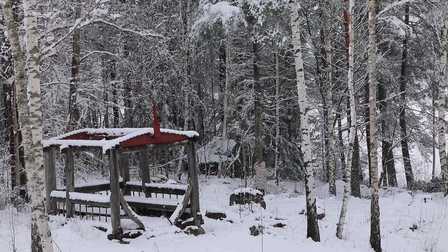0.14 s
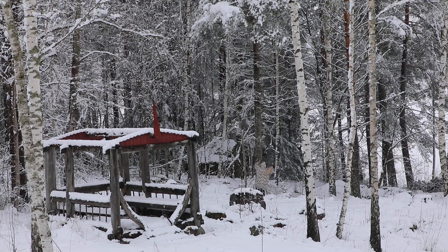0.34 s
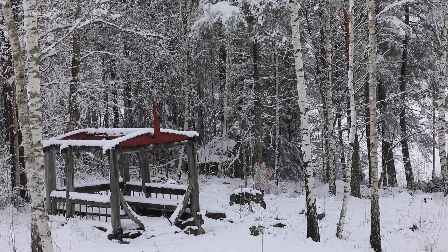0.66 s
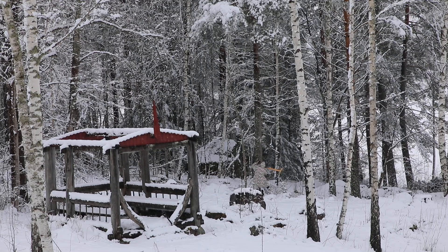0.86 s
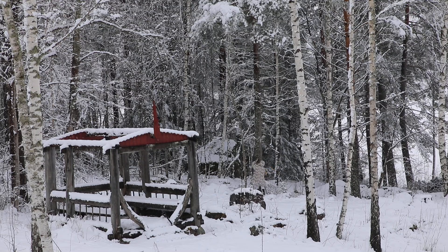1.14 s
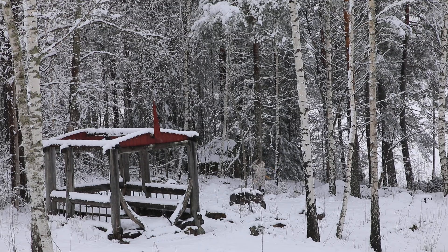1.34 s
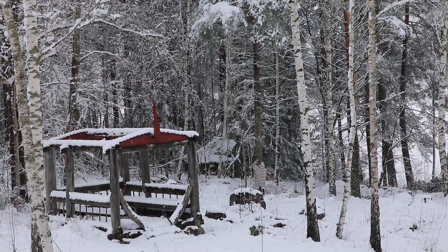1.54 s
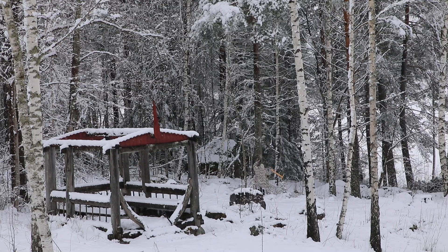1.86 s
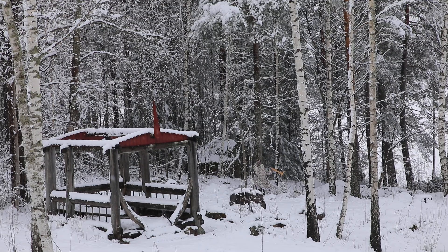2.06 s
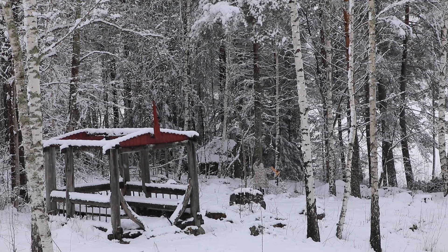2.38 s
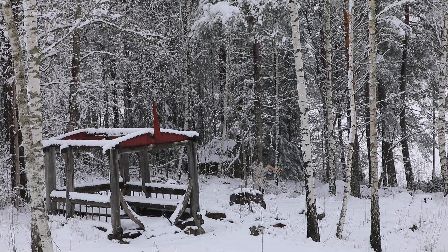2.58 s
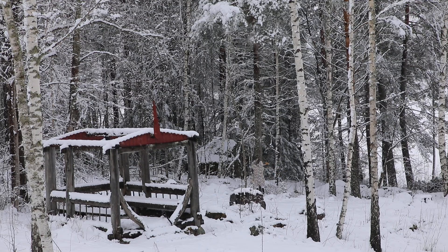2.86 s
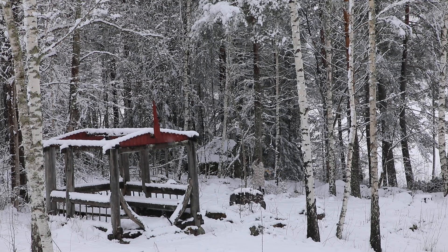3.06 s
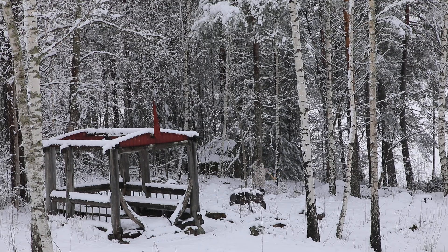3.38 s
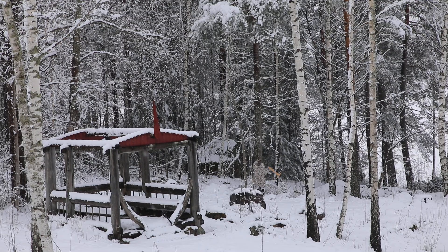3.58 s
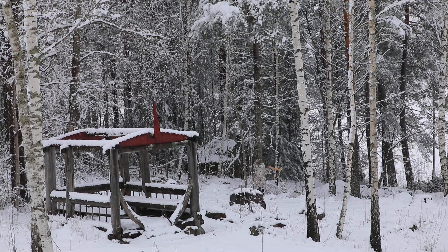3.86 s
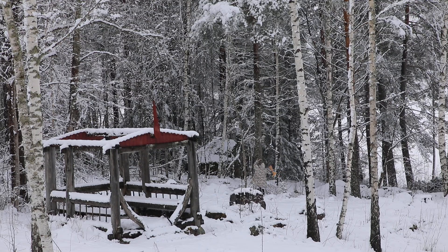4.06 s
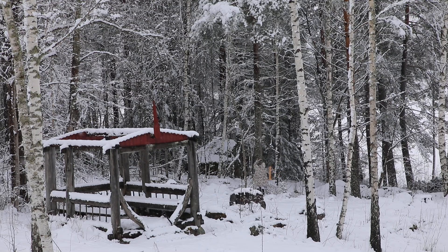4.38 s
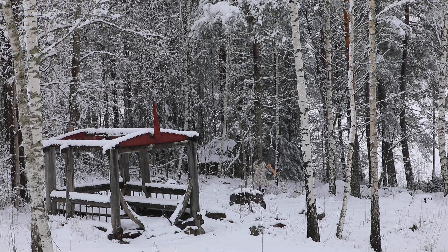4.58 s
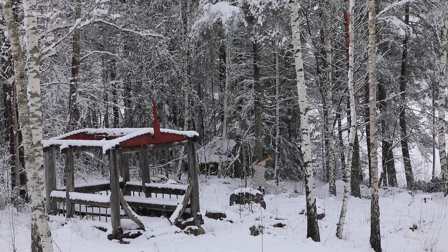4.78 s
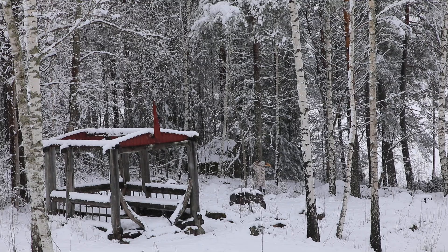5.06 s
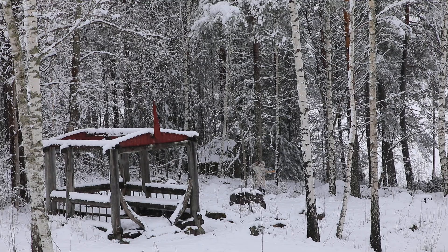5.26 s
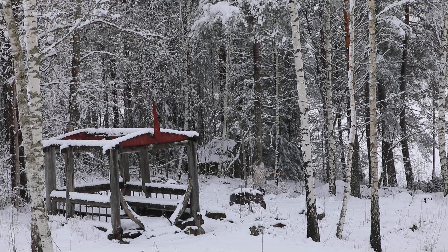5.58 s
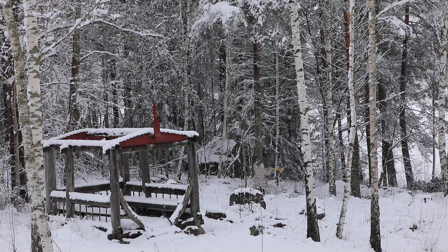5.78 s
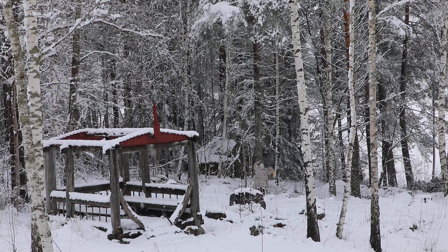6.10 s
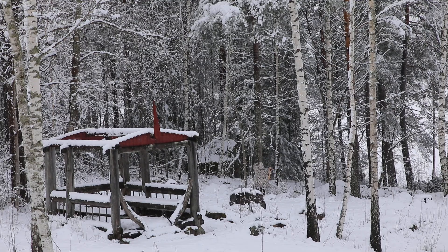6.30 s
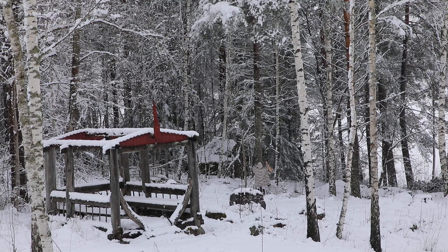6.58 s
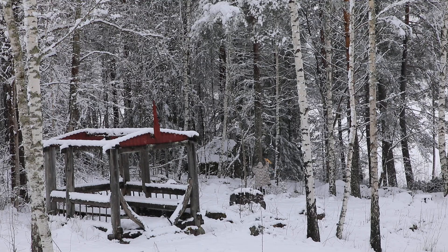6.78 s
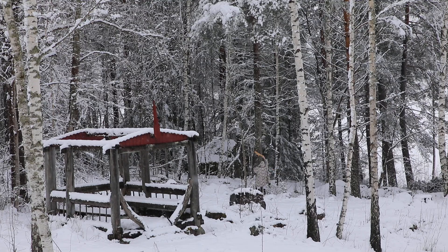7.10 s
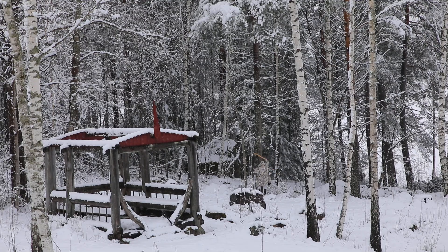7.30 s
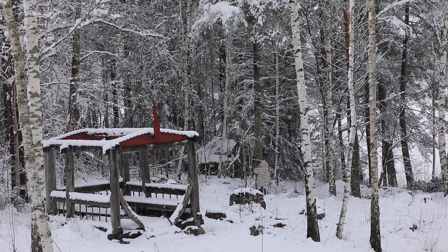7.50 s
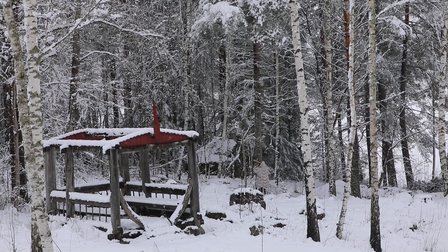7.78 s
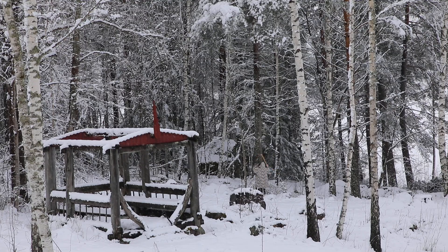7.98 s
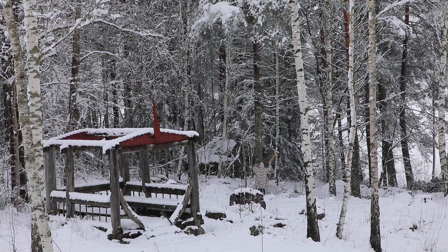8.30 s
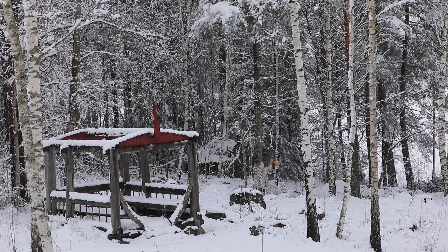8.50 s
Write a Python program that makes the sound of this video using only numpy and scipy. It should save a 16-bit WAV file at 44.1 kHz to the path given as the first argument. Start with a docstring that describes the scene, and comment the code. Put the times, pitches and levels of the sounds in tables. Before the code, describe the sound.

Four sharp axe chops split wood in a snowy forest, each echoing off the trunks, while small birds chatter between them over quiet air.

```python
"""Firewood is split with an axe in a snowy forest: small birds chatter and call over still air from the start.
Four axe blows follow as shaped noise forces, each filtered by its log's resonances; the near trunks scatter
them back as decaying noise and the far forest answers late. Meanwhile birds sing swept sines or throbbing
noise, icy twigs tick as bright bursts, and noise puffs of wind and a wavering low sine lie underneath.
Near the end come a soft knock of wood and a few last twig snaps."""
import sys
import numpy as np
from scipy import signal
from scipy.fft import rfft, irfft, next_fast_len
from scipy.io import wavfile
from scipy.ndimage import uniform_filter1d, map_coordinates

SR = 44100
rng = np.random.default_rng(int(sys.argv[2]) if len(sys.argv) > 2 else 0)


def to_wav(sig):
    """Store sig (one row per channel, or 1-D mono) as 16-bit WAV at the path in sys.argv[1].

    Samples outside -1..1 are clipped; the rate is SR.
    """
    pcm = np.clip(np.atleast_2d(sig), -1, 1) * 32767
    pcm = np.round(pcm).astype(np.int16)
    wavfile.write(sys.argv[1], SR, pcm.T)  # frames by channels


N = 381465

# axe blows: (time [s], level [dB], splitting time [s], splitting level [dB], trunk echo [dB],
#  treble change on the direct path [dB], beamed note [Hz], its height [dB], band that carries furthest [Hz],
#  far echo [dB], ripple of the log's tone [dB], its bass [dB], its midrange [dB], its bite [dB])
AXE_BLOWS = [(1.2184, -7, 0.0017, 27, 1, -14, 838, 9.5, 1590, 4, -3.5, -3.5, 3, 4.5),
             (3.0157, -2.5, 0.02, -13.5, -0.5, -5.5, 858, 8, 1090, 2, 3.5, -2, 2.5, -3),
             (5.051, 5, .017, -9.5, -1.5, -4, 1905, 7, 787, 1, 2.8, -7, -0.5, -5.5),
             (7.5332, -1.5, 0.011, -13.5, -0.5, -2.5, 1035, 12.5, 960, 1, 3, 4, -7, -4.5)]
# modes of wood on the block: (frequency [Hz], width [Hz], height above the broad spectrum [dB])
LOG_MODES = [(250, 69, 3), (494.7, 39, 8), (608, 15, 1.5), (738, 37, 3), (841, 30, 7.5), (950, 100, 4.5),
             (1280, 30, 1), (1385, 10, 12.5), (1513, 52, 6), (1742, 25, 6.5), (1734, 50, -2.5),
             (1906, 26, 12.5), (2112, 34.5, 6), (2342, 20, -0.5), (2590, 45, 3), (2776, 37, 11.5),
             (2884, 75, 14.5), (3700, 150, 9)]
# broad spectrum of struck wood: (frequency [Hz], level [dB])
WOOD_SPECTRUM = [(30, -23), (60, -13.5), (88, 2.5), (140, -19.5), (250, 5.5), (400, 12), (650, 18.5),
                 (950, 20.5), (1300, 16), (2200, 17.5), (3200, 5.5), (4800, -4), (8000, -3.5), (11000, -13),
                 (15500, -33.5)]
SHELTER_DELAY_S = .00811  # extra travel time by way of the shelter


def chops(shelter_db=-12, shade_hz=4000, note_width_hz=45, near_db=-35.5, far_db=-67, blur=0.29,
          carry_width_hz=280, carry_db=7):
    """Source, filter and path: a blow excites log modes, heard directly, off a shelter, trunks and far forest."""
    out = np.zeros(N)
    for s, db, split_s, split_db, echo_db, shade_db, note_hz, note_db, carry_hz, late_db, *tone_db in AXE_BLOWS:
        force = amp(db) * blow(split_s, split_db)

        def broad(hz):
            return along(WOOD_SPECTRUM, hz) + log_tone(hz, *tone_db)

        def modes(hz):
            return sum(resonance(hz, *mode) for mode in LOG_MODES)

        # directivity: one note is beamed to the listener, and the blade's treble may be hidden
        def facing(hz):
            return resonance(hz, note_hz, note_width_hz, note_db) + shelf(hz, shade_hz, shade_db)

        crack = ring(force, lambda hz: broad(hz) + modes(hz) + facing(hz))
        add(out, s, crack)
        add(out, s + SHELTER_DELAY_S, amp(shelter_db) * crack)
        # echoes gather sound sent out in all directions, so single modes stand out less
        spread = ring(force, lambda hz: broad(hz) + (1 - blur) * modes(hz))
        add(out, s, amp(near_db + echo_db) * trunks(spread))
        carried = ring(force, lambda hz: broad(hz) + resonance(hz, carry_hz, carry_width_hz, carry_db))
        add(out, s, amp(far_db + late_db) * distance(carried))
    return out


def blow(split_s, split_db, bite_s=.002, easing_s=.04, release_s=0.0011, tear_hz=4500, dull_db=-7):
    """Impact and fracture: a sharp bite, then duller tearing fibres, easing until the log gives way."""
    t = np.arange(2048) / SR
    edge = np.exp(-t / bite_s)
    tearing = amp(split_db) * np.exp(-t / easing_s - np.maximum(t - split_s, 0) / release_s)
    force = burst(np.hypot(edge, tearing))
    dull = ring(force, lambda hz: shelf(hz, tear_hz, dull_db), size=len(t))
    return edge * force + (1 - edge) * dull


# a log's tone ripples evenly along frequency: spacing of the crests, and where they fade out
RIPPLE_HZ, RIPPLE_TOP_HZ = 952, 2560
# top of the bass, then centre and width of the midrange and of the bite
BASS_HZ, MID_HZ, MID_WIDTH_HZ, BITE_HZ, BITE_WIDTH_HZ = 620, 1775, 930, 3020, 592


def log_tone(hz, ripple_db, bass_db, mid_db, bite_db):
    """Timbre as a spectral envelope, in dB: even crests, with more or less bass, midrange and bite."""
    crests = np.cos(2 * np.pi * hz / RIPPLE_HZ) * (hz > RIPPLE_HZ / 4) / (1 + (hz / RIPPLE_TOP_HZ) ** 8)
    bass = bass_db - shelf(hz, BASS_HZ, bass_db)
    mid = resonance(hz, MID_HZ, MID_WIDTH_HZ, mid_db)
    bite = resonance(hz, BITE_HZ, BITE_WIDTH_HZ, bite_db)
    return ripple_db * crests + bass + mid + bite


# reverberation of the near trunks: (frequency [Hz], time to decay by 60 dB [s])
TRUNK_DECAY = [(100, 0.97), (400, 0.71), (900, 0.66), (2000, 0.65), (3500, 0.54), (7000, 0.26),
               (13000, .25)]
# a stand of trees returns a late slap: delay, half length, strength
SLAP_S, SLAP_HALF_S, SLAP_DB = 0.24, 0.028, 2.5


def trunks(x, build_s=0.0037):
    """Multiple scattering: convolution with lumpy noise whose treble dies first, with one late slap."""
    t = np.arange(2 * SR) / SR
    lump_db = 3 * unit(uniform_filter1d(rng.standard_normal(len(t)), size=90))
    lumps = unit(amp(lump_db))
    hz, age, bands = signal.stft(rng.standard_normal(len(t)) * lumps, SR, nperseg=256)
    decay = amp(-60 * age / along(TRUNK_DECAY, hz)[:, None])
    tail = signal.istft(bands * decay, SR, nperseg=256)[1][:len(t)]
    slap = amp(SLAP_DB * np.exp(-((t - SLAP_S) / SLAP_HALF_S) ** 2))
    onset = 1 - np.exp(-(t / build_s) ** 2)
    return signal.fftconvolve(x, tail * slap * onset)


# spectrum of the far forest's answer: (frequency [Hz], level [dB])
FAR_SPECTRUM = [(100, -6), (400, 9), (850, 0), (2000, -0.5), (3500, -2.5), (8000, -25.5)]


def distance(x, t60_s=2.88, build_s=0.29):
    """Late reverberation: the far forest's dull answer swells slowly and then decays exponentially."""
    t = np.arange(2 * SR) / SR
    onset = 1 - np.exp(-(t / build_s) ** 2)
    return signal.fftconvolve(x, noise(FAR_SPECTRUM, size=len(t)) * amp(-60 * t / t60_s) * onset)


def forest(x, echo_db):
    """Superposition: the direct sound x and its echo from the near trunks."""
    out = amp(echo_db) * trunks(x)
    add(out, 0, x)
    return out


# light knocks of wood: (time [s], level [dB])
WOOD_KNOCKS = [(8.444, -24.5)]


def knocks(contact_s=0.032, slope_db=-3.5):
    """Soft impact: a long, scuffing contact drives the broad wood spectrum, without its modes."""
    out, t = np.zeros(N), np.arange(4096) / SR
    for s, db in WOOD_KNOCKS:
        force = burst(np.exp(-t / contact_s))
        # the slope is per octave
        knock = ring(force, lambda hz: along(WOOD_SPECTRUM, hz) + slope_db * np.log2((hz + 100) / 1000))
        add(out, s, amp(db) * forest(knock, echo_db=-51))
    return out


# icy twigs, from sharp snaps to soft rustles: (time [s], level [dB], decay time [s])
TWIG_TICKS = [(.209, -34, 0.0043), (.7053, -25.5, 0.0047), (5.352, -30, 0.037), (6.186, -20.5, 0.044),
              (6.862, -31, 0.022), (8.4270, -13, 0.0009), (8.431, -12, 0.0024), (8.5008, -36, .0007)]
# spectrum of an icy twig: (frequency [Hz], level [dB])
TWIG_SPECTRUM = [(300, -15), (2000, -11), (4500, -11), (5500, -12), (6800, 1.5), (8500, -7.5), (10000, -5),
                 (12000, -11), (13300, -21), (15500, -23.5)]


def twigs(rustle_s=0.064, rustle_db=-25):
    """Brittle fracture: a decaying noise force with a short rustle excites a small, bright body close by."""
    out, t = np.zeros(N), np.arange(8192) / SR
    for s, db, decay_s in TWIG_TICKS:
        snap = np.exp(-t / decay_s)
        rustle = amp(rustle_db) * np.exp(-(t / rustle_s) ** 2)
        add(out, s, amp(db) * ring(burst(snap + rustle), lambda hz: along(TWIG_SPECTRUM, hz)))
    return out


# phrases of a small bird: (time [s], syllables [count], first gap [s], level against the bird's level [dB])
BIRD_PHRASES = [(0, 4, .069, 0), (.675, 1, .07, -5), (1.130, 1, .07, 2), (2.198, 2, .08, -1),
                (2.597, 1, .07, -3), (4.033, 3, .063, -1.5), (4.619, 5, .071, 0.5), (5.624, 7, .072, 0),
                (6.551, 5, .067, 1), (7.497, 1, .07, 0)]
BIRD_DB, SLOWING_S = -58.5, .0039  # the bird's level; each gap is longer than the last by SLOWING_S
# a phrase warms up: opening and settled pitch, syllables it takes, extra level of the opening
OPENING_HZ, SETTLED_HZ, WARM_UP, OPENING_DB = 2380, 2540, 0.77, 2
# size in octaves of the settled hook, the opening curl and the settled curl
HOOK_OCT, OPENING_CURL_OCT, CURL_OCT = .68, .25, .13
# chance differences between syllables: of hook and curl (share of their size), of pitch (octaves)
SHAPE_SCATTER, PITCH_SCATTER = .3, .04


def chatter(curl_db=-4, echo_db=-35.5):
    """Frequency modulation: a low rising note opens, then slowing syllables settle into falling hooks with curls."""
    out, t = np.zeros(N), np.arange(SR // 16) / SR
    # loudness of the two parts
    hook = np.exp(-((t - .010) / .007) ** 2)
    curl = np.exp(-((t - .030) / .012) ** 2)
    # shapes of the falling and the rising pitch
    fall = np.exp(-(t / .0105) ** 1.3)
    rise = np.exp(-((t - .033) / .012) ** 2)
    for start, count, gap, db in BIRD_PHRASES:
        for k in range(round(count)):
            opening = np.exp(-k / WARM_UP)
            base_hz = SETTLED_HZ + opening * (OPENING_HZ - SETTLED_HZ)
            scatter = 1 + SHAPE_SCATTER * rng.uniform(-1.1, 1, size=2)
            hook_oct, curl_oct = np.array([HOOK_OCT, CURL_OCT]) * scatter
            settled_shape = hook_oct * fall + curl_oct * rise
            octaves = (1 - opening) * settled_shape + opening * OPENING_CURL_OCT * rise
            pitch_hz = base_hz * 2 ** (octaves + PITCH_SCATTER * rng.standard_normal())
            loudness = (1 - opening / 2) * hook + amp(curl_db) * curl
            note = loudness * np.sin(2 * np.pi * np.cumsum(pitch_hz) / SR)
            s = start + k * gap + SLOWING_S * k * (k - 1) / 2
            add(out, s, amp(BIRD_DB + db + opening * OPENING_DB) * forest(note, echo_db))
    return out


# far buzzing trills: (middle [s], half length [s], level [dB])
TRILL_SWELLS = [(.2, 0.34, -71), (3.2, 0.22, -68), (6.27, 0.25, -65)]
# spectrum of a trill: (frequency [Hz], level [dB])
TRILL_SPECTRUM = [(2600, -67), (3050, -12), (3330, -1), (3600, -5.5), (3780, -8), (4030, -4.5), (4300, -22),
                  (5500, -52)]


def trills(pulse_hz=167, depth=0.42):
    """Amplitude modulation: a far bird's hoarse, narrow noise band swells and throbs very fast."""
    throb = 1 + depth * np.sin(2 * np.pi * pulse_hz * np.arange(N) / SR)
    return swells(TRILL_SWELLS) * unit(throb * noise(TRILL_SPECTRUM))


# faint far calls: (time [s], pitch [Hz], level [dB])
FAR_CALLS = [(.08, 1014, -60.5), (.33, 1165, -67), (0.576, 1144, -62.5), (.755, 1025, -65)]


def hoots(length_s=0.068, droop=0.084):
    """Gliding tone: a far bird's short sine calls fall by a small share of their pitch."""
    out, t = np.zeros(N), np.arange(SR // 6) / SR
    progress = np.minimum(t / length_s, 1)
    for s, hz, db in FAR_CALLS:
        pitch_hz = hz * (1 - droop * (progress - .5))
        call = np.sin(np.pi * progress) * np.sin(2 * np.pi * np.cumsum(pitch_hz) / SR)
        add(out, s, amp(db) * forest(call, echo_db=-35))
    return out


# puffs of wind on the microphone: (middle [s], half length [s], level [dB])
WIND_PUFFS = [(1.59, 0.033, -71), (1.79, 0.0063, -62), (2.28, 0.038, -63), (4.80, 0.064, -54),
              (4.91, 0.063, -62.5), (8.14, 0.037, -60.5), (8.29, 0.048, -67.5)]
# spectrum of a puff: (frequency [Hz], level [dB])
PUFF_SPECTRUM = [(15, 11), (35, 7), (60, 19.5), (95, 5.5), (160, -5), (400, -31), (1500, -90)]


def wind():
    """Turbulence at the microphone: low-pitched noise in short swells."""
    return swells(WIND_PUFFS) * noise(PUFF_SPECTRUM)


# level of the drone: (time [s], level [dB])
DRONE_LEVEL = [(0, -84.5), (3.7, -75.5), (4.4, -90.5), (8.65, -110)]


def drone(centre_hz=50):
    """Random modulation: a far, low sine wavers in pitch and level."""
    t = np.arange(N) / SR
    tone = unit(np.sin(2 * np.pi * np.cumsum(centre_hz + .5 * wobble(7.8)) / SR))
    return amp(np.interp(t, *np.transpose(DRONE_LEVEL)) + wobble(3.3)) * tone


# spectrum of the still air: (frequency [Hz], relative density [dB per Hz])
AIR_SPECTRUM = [(15, -30.5), (25, -8), (54, -8), (81, -11.5), (108, -10.5), (176, -6), (582, -7),
                (622, -6.5), (1110, -9.5), (1350, -10.5), (2750, -14.5), (5000, -25.5), (6500, -67),
                (11000, -120)]
# level of the still air: (time [s], level [dB])
AIR_COURSE = [(0, -62.5), (1.1, -63), (2.7, -63), (4.4, -63), (7.2, -63.5), (8.65, -62.5)]


def still_air():
    """Ambient noise: a steady, mostly low-pitched spectrum with slight random changes of level."""
    t = np.arange(N) / SR
    return amp(np.interp(t, *np.transpose(AIR_COURSE)) + .4 * wobble(4.5)) * noise(AIR_SPECTRUM)


def amp(db):
    """Logarithmic level: decibels to gain."""
    return 10 ** (np.asarray(db) / 20)


def unit(x):
    """Normalisation: x at rms 1."""
    return x / np.sqrt(np.mean(x ** 2) + 1e-20)


def along(points, hz):
    """Interpolation on a logarithmic frequency axis of (frequency [Hz], value) points."""
    f, v = np.transpose(points)
    return np.interp(np.log(hz + 1), np.log(f + 1), v)


def add(track, s, sound):
    """Superposition: mix a sound into the track at time s."""
    part = track[max(round(s * SR), 0):][:len(sound)]
    part += sound[:len(part)]


def wobble(rate):
    """Band-limited fluctuation: a smooth random curve, rate knots a second."""
    knots = rng.standard_normal(int(N * rate / SR) + 4)
    return map_coordinates(knots, [np.arange(N) * rate / SR])


def swells(rows):
    """Amplitude envelope: gain over time of bell-shaped swells."""
    t = np.arange(N) / SR
    return sum(amp(db) * np.exp(-((t - s) / half) ** 2) for s, half, db in rows)


def noise(spectrum, size=N):
    """Spectral shaping: white noise coloured by a spectrum in dB, at rms 1."""
    gain = amp(along(spectrum, np.fft.rfftfreq(size, 1 / SR)))
    return unit(irfft(rfft(rng.standard_normal(size)) * gain, size))


def ring(force, colour_db, size=16384):
    """Minimum phase: the causal answer to a force of a body whose gain is colour_db(Hz)."""
    cepstrum = irfft(np.log(amp(colour_db(np.fft.rfftfreq(size, 1 / SR)))))
    # folding the cepstrum onto positive time makes the answer causal
    cepstrum[1:size // 2] *= 2
    cepstrum[size // 2 + 1:] = 0
    return irfft(np.exp(rfft(cepstrum)) * rfft(force, size))


def burst(envelope, count=6):
    """Broadband excitation: a noise force of energy 1 that follows the envelope with a nearly flat spectrum."""
    force = rng.standard_normal(len(envelope)) * envelope
    for _ in range(count):
        # flatten the spectrum, then restore the envelope
        force = irfft(np.exp(1j * np.angle(rfft(force))), len(force))
        force *= envelope / np.sqrt(np.abs(uniform_filter1d(force ** 2, size=64)) + 1e-14)
    return force / np.linalg.norm(force)


def resonance(hz, centre, width, db):
    """Resonance: a peak in dB that falls to half its height half a width from the centre."""
    return db / (1 + (2 * (hz - centre) / width) ** 2)


def shelf(hz, corner, db):
    """Shelving filter: a change of db above the corner frequency."""
    return db / (1 + (corner / (hz + 1)) ** 4)


def scene():
    """Superposition of all sources at one microphone."""
    birds = chatter() + trills() + hoots()
    background = wind() + drone() + still_air()
    return (chops() + knocks() + twigs() + birds + background)[None]


# spectrum of the microphone's hiss: (frequency [Hz], relative density [dB per Hz])
HISS_SPECTRUM = [(3000, -20.5), (4500, -5), (5500, -4.5), (6800, 0.5), (7500, 0), (8400, -5), (10000, 2),
                 (12000, 2.5), (14000, 0), (15700, -8.5)]
TOP_HZ = 15850  # band limit


def record(dry, hiss_db=-71):
    """Self-noise and band limiting: the microphone adds hiss and keeps nothing above its band limit."""
    size = next_fast_len(N + 8192)
    spectrum = rfft(dry + amp(hiss_db) * noise(HISS_SPECTRUM), size)
    return irfft(spectrum * (np.fft.rfftfreq(size, 1 / SR) < TOP_HZ), size)[:, :N]


dry = scene()
out = record(dry)
to_wav(out)
```